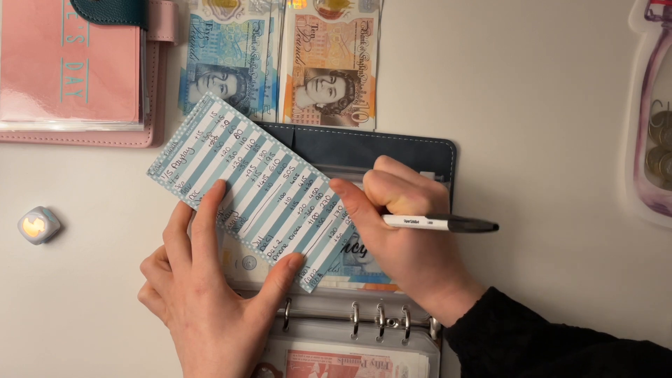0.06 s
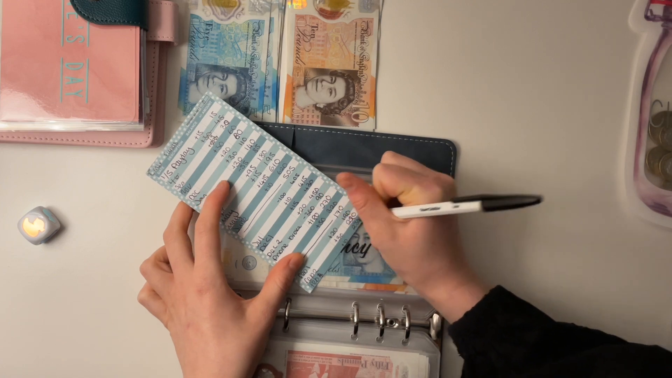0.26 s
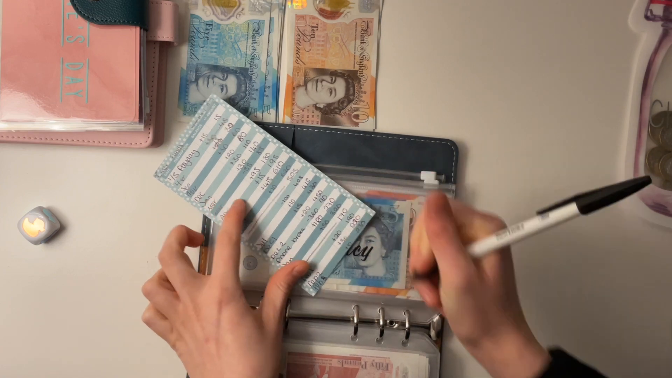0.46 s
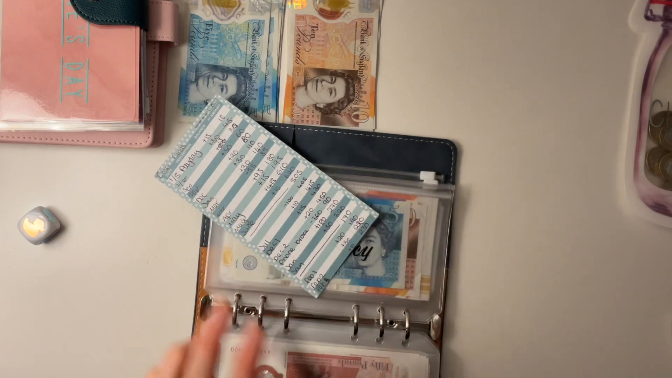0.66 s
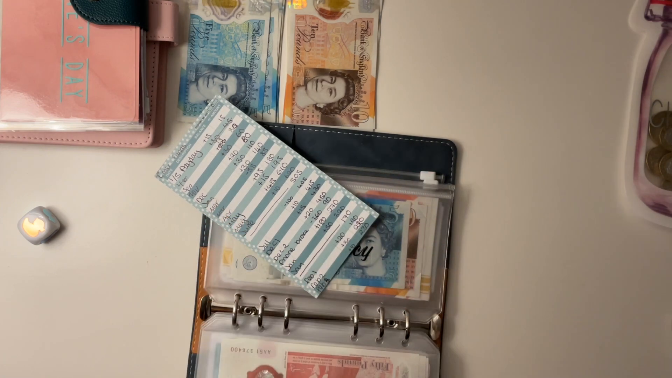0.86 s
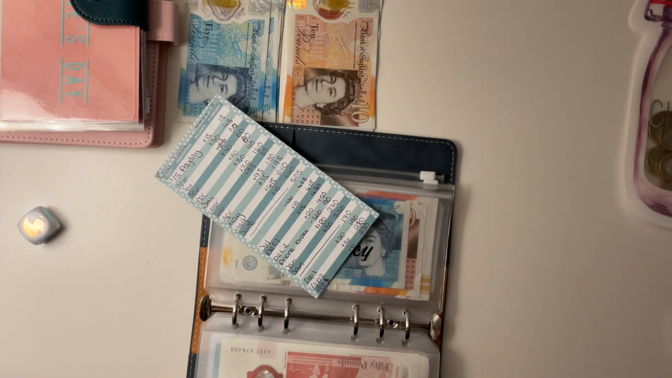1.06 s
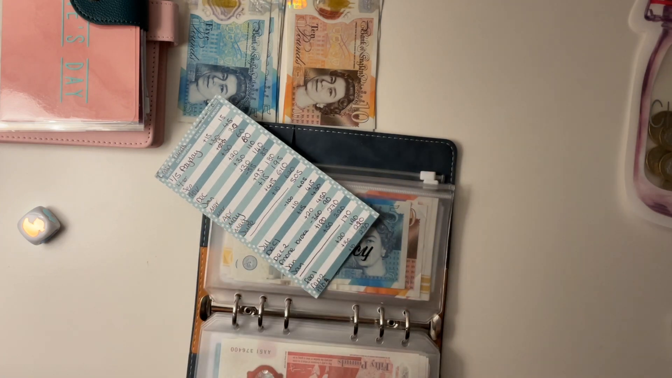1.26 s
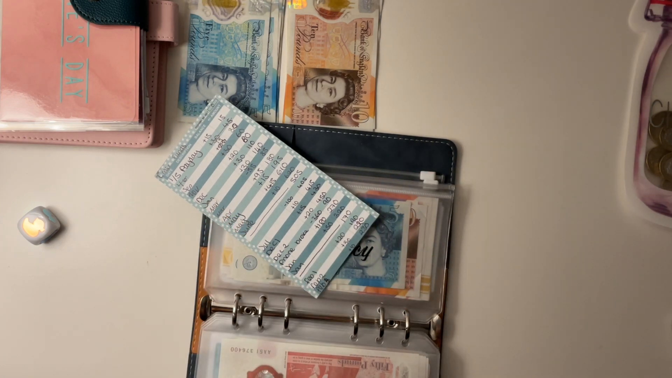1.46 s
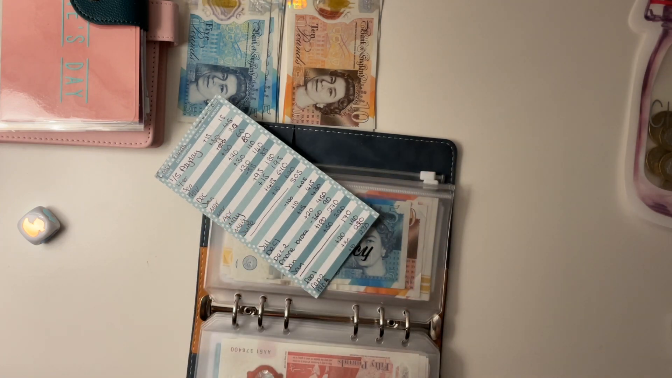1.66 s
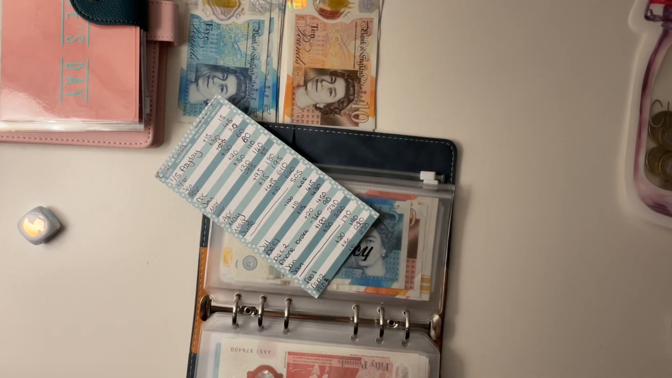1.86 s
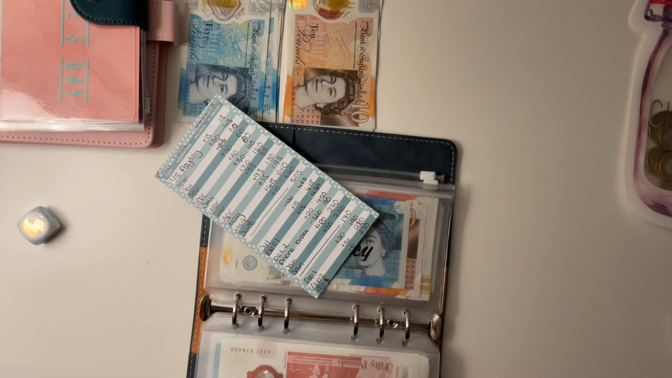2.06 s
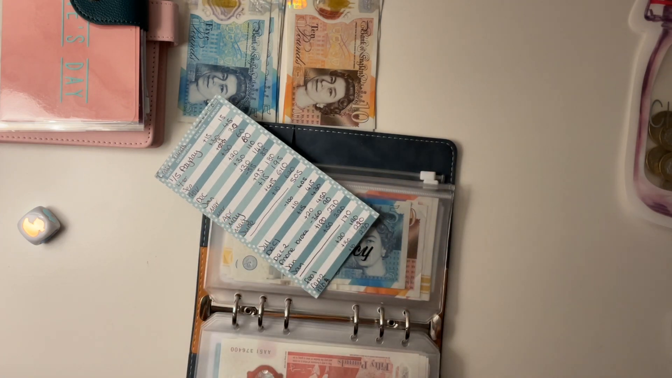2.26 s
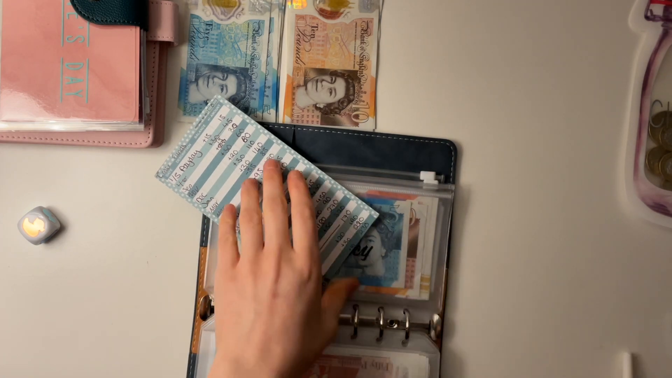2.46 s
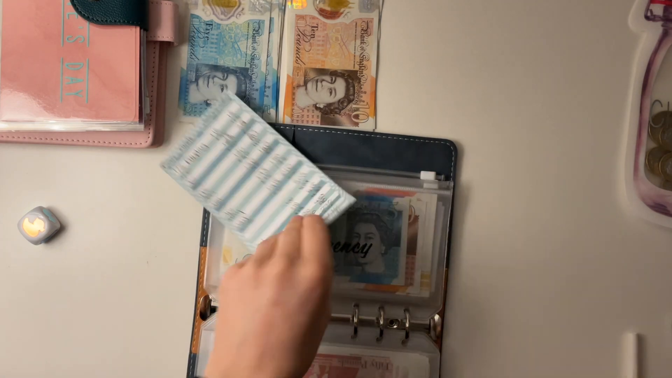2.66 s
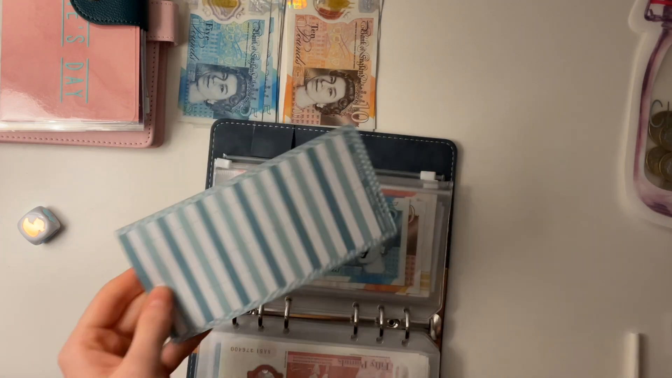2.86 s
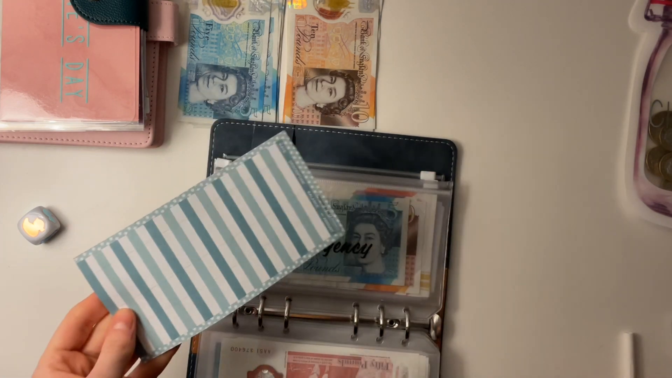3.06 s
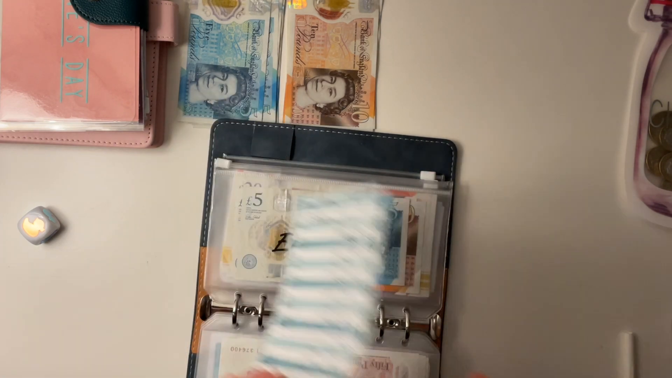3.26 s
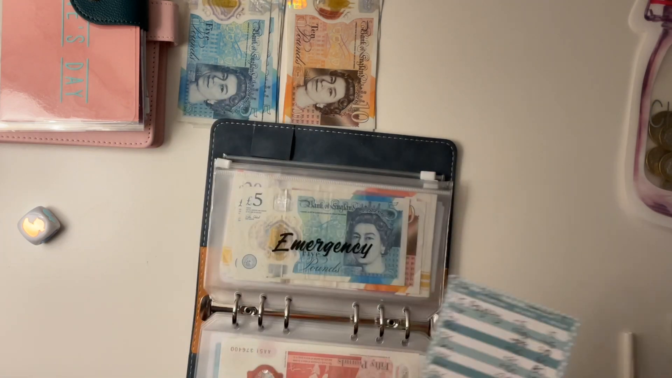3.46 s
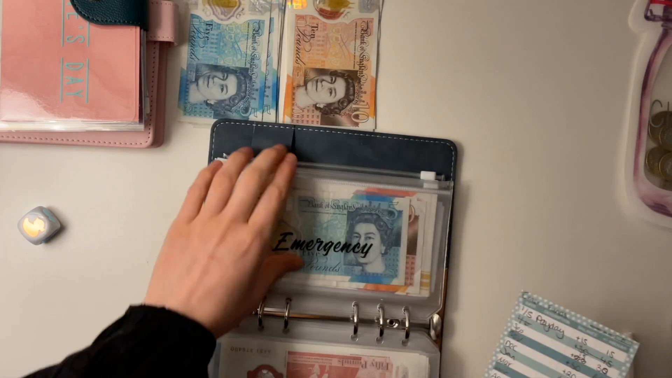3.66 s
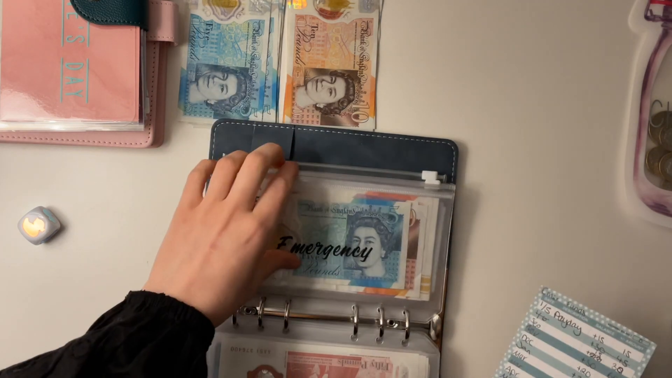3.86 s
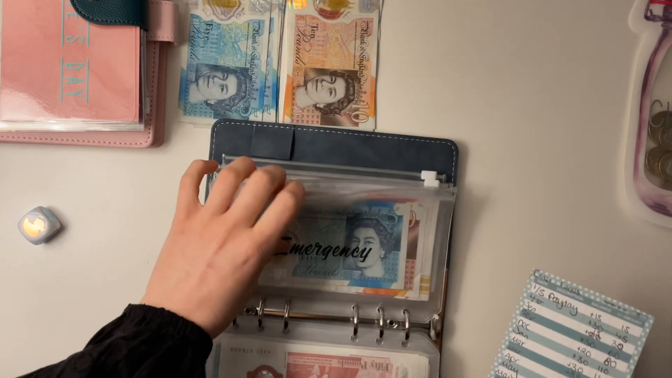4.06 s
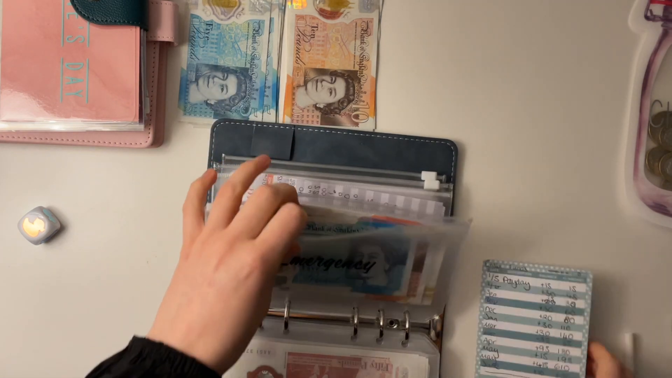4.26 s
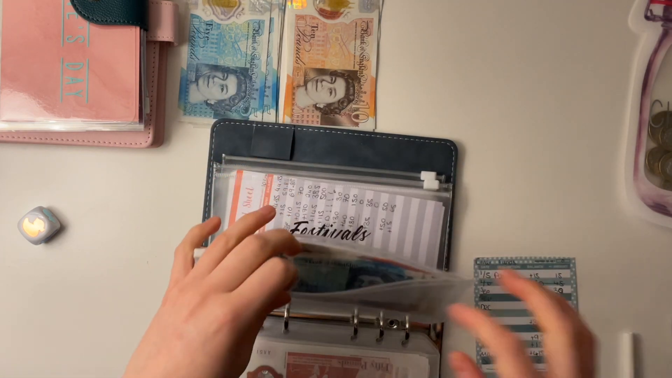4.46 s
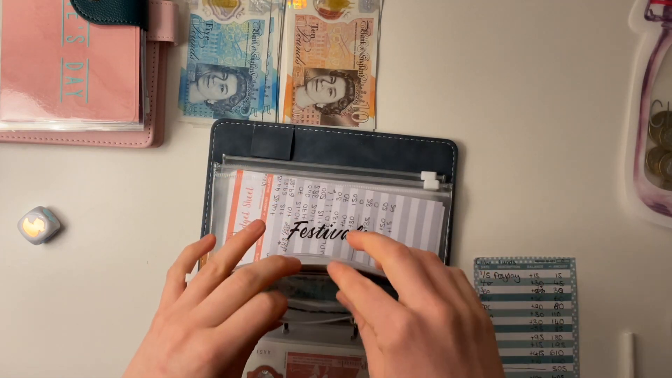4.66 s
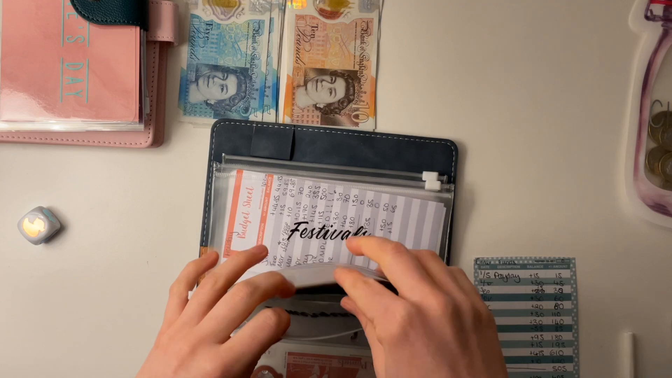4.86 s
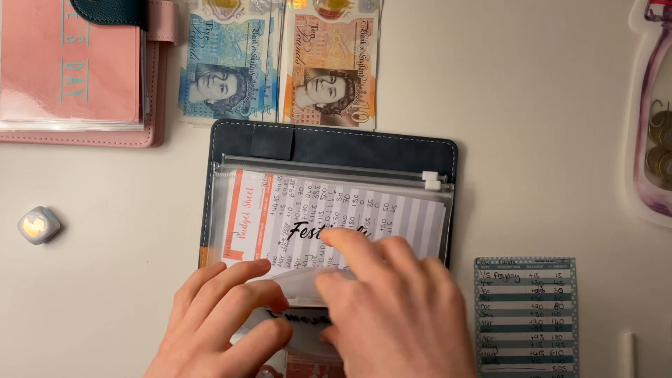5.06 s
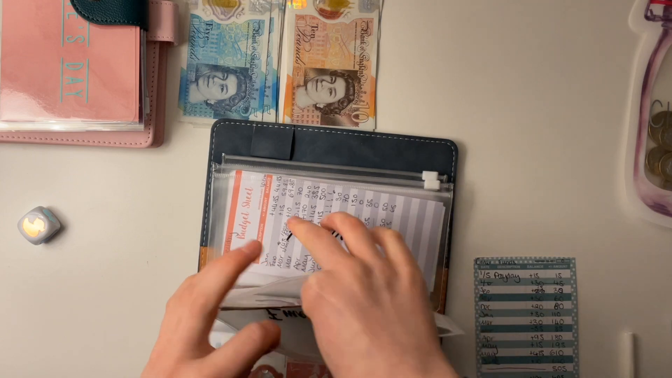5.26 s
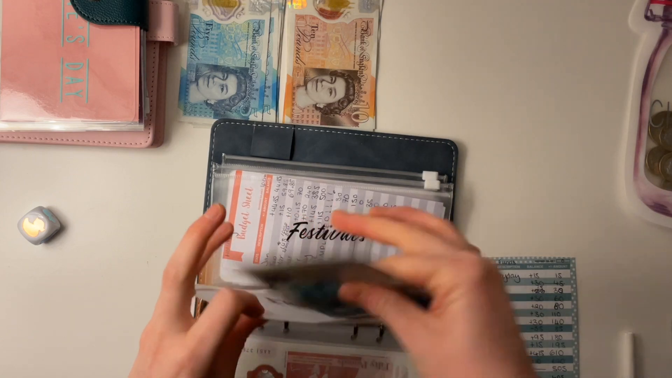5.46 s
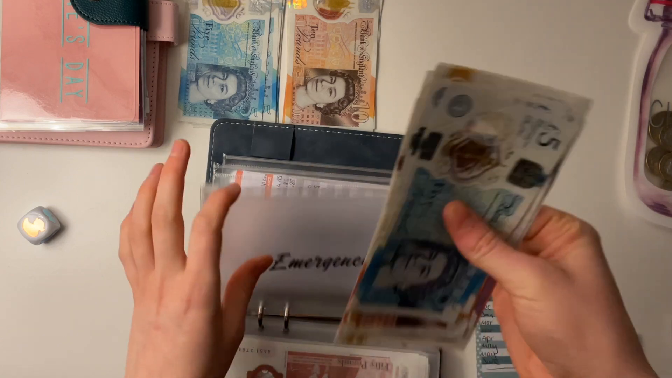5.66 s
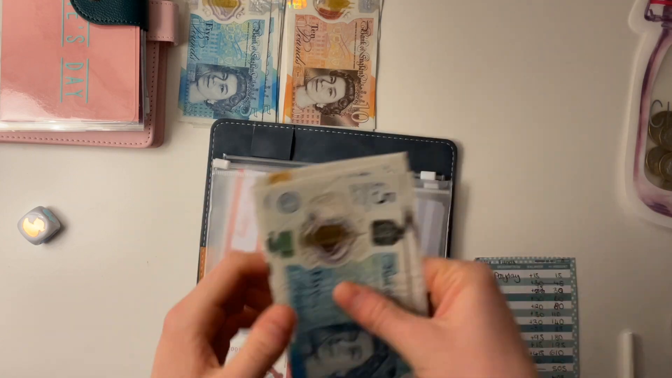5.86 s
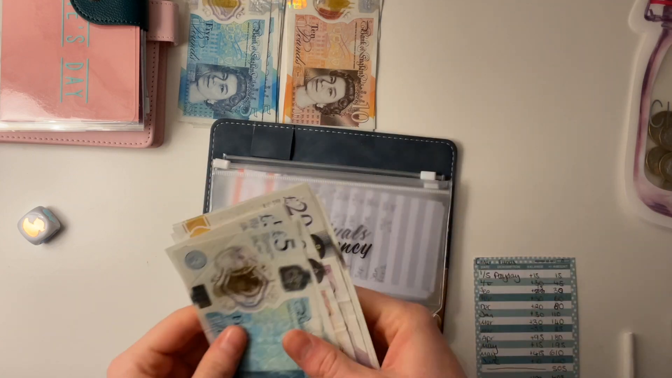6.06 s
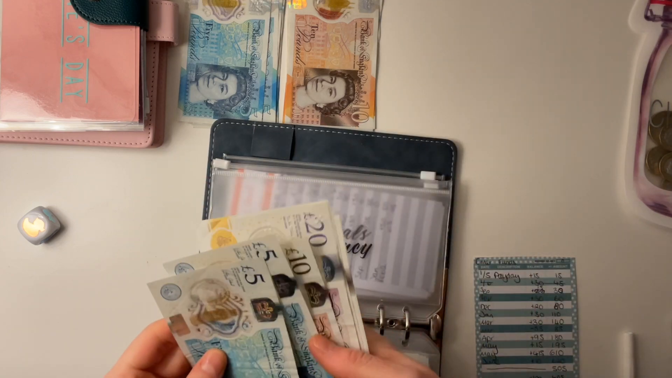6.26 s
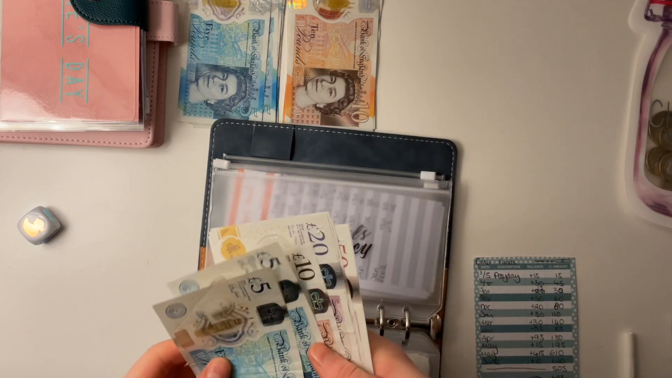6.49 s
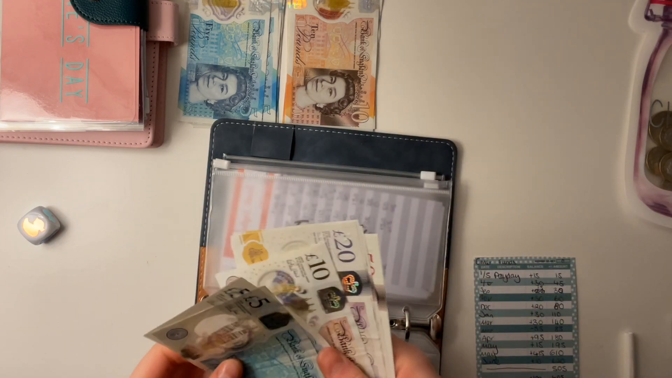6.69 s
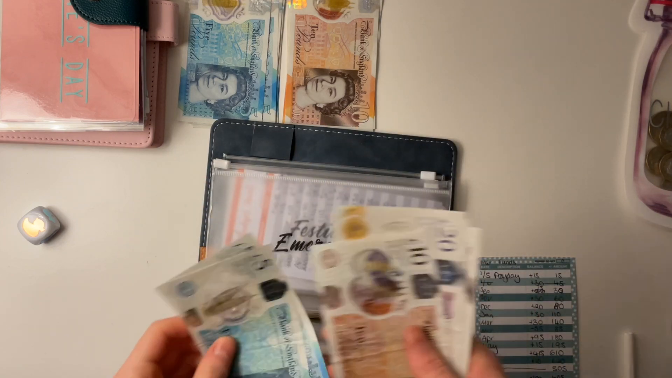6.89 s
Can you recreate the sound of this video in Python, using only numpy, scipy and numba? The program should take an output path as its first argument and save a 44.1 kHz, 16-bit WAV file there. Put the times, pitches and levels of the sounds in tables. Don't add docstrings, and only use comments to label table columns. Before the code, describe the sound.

A pen clicks shut, a card slaps and flips sharply on a desk, then banknotes slide hissing from a plastic wallet and rustle as they fan.

```python
import sys
import numpy as np
from scipy import signal
from scipy.fft import rfft, irfft
from scipy.io import wavfile
from scipy.ndimage import uniform_filter1d
from numba import njit

SR = 44100
rng = np.random.default_rng(int(sys.argv[2]) if len(sys.argv) > 2 else 0)


def undo_db(level):
    steps = np.asarray(level, float) / 20
    return 10 ** steps


def put_to_file(sound):
    columns = np.atleast_2d(sound).T
    safe = np.clip(columns, -1, 1)
    whole_steps = np.round(safe * 32767)
    wavfile.write(sys.argv[1], SR, whole_steps.astype(np.int16))


N = 305613

# (t/s, peak level/dB, resonance f/Hz, sizzle level/dB, flap level/dB)
PEN = [
    (0.3007, -43.5, 3860, -16, -4.5),
    (0.311, -44.5, 3870, -13, -5),
    (0.3896, -53, 4600, 3, 1),
    (0.4261, -59, 1800, 11, 10),
    (0.6019, -64.5, 3150, 3, 6),
    (1.0266, -31, 5900, 8, -22),
    (1.8092, -46.5, 5600, 6, -26),
    (1.8425, -48, 4030, 4, -37),
    (2.195, -59.5, 6500, 10.5, -1),
]
CARD = [
    (2.4451, -21, 4260, 0.5, -26.5),
    (2.6059, -28.5, 5700, -2, -3.5),
    (2.6268, -13.5, 2770, -1.5, -8.5),
    (2.6521, -22, 1740, -20, 1),
    (2.561, -46, 3970, 0, -10),
    (3.345, -31.5, 5000, -7.5, -8),
    (3.4057, -42.5, 4300, -3, 5.5),
]
WALLET = [
    (4.0665, -38, 3500, -2, -7.5),
    (4.2215, -54.5, 3240, 9.5, -3),
    (4.2575, -32, 2390, 3, 1),
    (4.3197, -46.5, 2630, -26, 7),
    (4.3672, -36, 2630, -24, 0),
    (4.6468, -47, 2020, -3.5, 4),
    (4.7881, -50, 3350, -22, -2),
    (4.8569, -48, 3130, -1, -7),
]
BANKNOTES = [(5.3871, -34, 3400, 4, 3), (5.6418, -39.5, 3270, 3, -3), (5.6521, -27.5, 5530, -10, -4),
             (5.7183, -30, 4570, 8, -4.5), (5.932, -61.5, 4170, 13, -10), (5.9845, -52, 2760, 4.5, -1),
             (6.6345, -42.5, 6430, 6, -28), (6.641, -58, 7500, 0, -22), (6.664, -65, 6200, -5, -13),
             (6.7717, -64, 5000, 10, -12), (6.8018, -63.5, 5390, 21, 9), (6.863, -62, 4960, 19, -3),
             (6.882, -60, 6470, 12, -10), (6.897, -53, 6000, 13, -8)]
TICKS = [(1.8193, -46, 2660, 3, -12), (2.633, -25.5, 2400, -10, -2.5), (2.6545, -32, 4170, 3, -3),
         (2.664, -39, 2400, -9, -2), (3.3415, -20.5, 2100, -25, 0), (3.3435, -24, 3850, -16, -15),
         (3.35, -30, 2050, -22, 1.5), (3.4235, -29.5, 1950, -18, 2), (3.434, -40.5, 1220, -25, 4),
         (3.678, -40.5, 4530, -30, -12), (3.6994, -50, 4770, -10, -14), (3.7429, -47, 4270, -10, 2.5),
         (3.8551, -60, 3770, -19, 1), (4.0235, -45.5, 3700, 6.5, -8.5), (4.5404, -46.5, 1950, -16, -5),
         (4.5424, -48, 3300, -22, -20), (4.566, -41.5, 1480, -28, -1), (4.575, -45, 1720, -26, -6),
         (4.7264, -51, 2280, -10, 4), (4.915, -46, 3960, -27, -26), (5.0554, -26, 2030, -28, 0),
         (5.35, -33.5, 1960, -8, -1), (5.46, -40, 2000, -6, 0), (6.582, -48, 4400, -17, -20)]


def snaps(table, t60, pocket, spread, lead_s=.012, lead_db=-28):
    rise_s, crack_s, tail_db = 0.0019, 0.0034, -9
    out, t = np.zeros(N), np.arange(SR // 4) / SR
    after = np.maximum(t - lead_s, 0)
    rattle = undo_db(tail_db - 60 * after / t60)
    shape = (1 - np.exp(-after / rise_s)) ** 2 * (np.exp(-after / crack_s) + rattle)
    creak = undo_db(lead_db) * t / lead_s * (after < rise_s)
    shape = shape + creak
    for s, db, hz, sizzle_db, flap_db in table:
        bursts = np.minimum(np.abs(crackle(len(t), 0.022, 2.3)), 6)
        creases = 1 + 0.42 * bursts * np.exp(-after / 0.016)
        low, mid, top = (shape * creases * crackle(len(t), .3, 2.0) for _ in range(3))

        broad = band(band(mid, 2230, 6800), 1090, 6500)
        tuned = band(band(mid, 0.822 * hz, 1.06 * hz), 0.87 * hz, 1.34 * hz)
        sheet = pocket * unit(tuned)
        sheet = sheet + spread * (unit(broad) + 0.77 * patches(broad, 1820, 7360, 45.0, count=14))

        edge = unit(band(top, 6700, 13400)) + 0.54 * unit(band(top, 10500, 14700))
        edge = edge + 0.31 * patches(top, 7000, 20000, 80, count=8)
        flap = 1.29 * patches(low, 460, 1685, 29, count=6) + unit(band(low, 460, 2370))
        size = undo_db(db - 6.0) * np.sqrt(np.mean(shape ** 2))
        add(out, s - .002 - lead_s, size * (sheet + undo_db(sizzle_db) * edge + undo_db(flap_db) * flap))
    return out


# (fastest at t/s, rise/s, fall/s, level/dB, brightness/dB per layer)
BRUSHES = [
    (.335, 0.049, 0.074, -62, 3),
    (.56, 0.056, 0.026, -82, 9.5),
    (.88, 0.14, 0.064, -78, 9.5),
    (1.08, 0.026, 0.21, -74.5, 4),
    (2.204, 0.14, 0.21, -73, 0.5),
    (3.23, 0.13, 0.12, -74, -1),
]
SLIDES = [(1.13, 0.072, 0.064, -84, -9), (1.64, 0.081, 0.067, -62.5, -1.5),
          (2.38, 0.16, 0.098, -75.5, -3.5), (2.49, 0.06, 0.058, -49, -2), (2.574, 0.034, 0.081, -49.5, 5),
          (2.665, 0.035, 0.05, -46.5, 1), (2.725, 0.053, 0.022, -46, 1), (2.76, 0.057, 0.042, -55.5, 7),
          (2.8, .02, 0.02, -74, 6), (2.95, 0.08, 0.027, -96, -13.5), (3.37, 0.022, 0.074, -55, 1.5),
          (3.438, 0.049, 0.023, -57, -6.5), (3.754, 0.091, 0.063, -69.5, -1.5),
          (4.082, 0.043, 0.03, -57.5, 2.5), (4.19, 0.036, 0.17, -76.5, -10), (4.28, 0.027, 0.045, -52, 1.5),
          (4.385, 0.033, 0.045, -69.5, -11), (4.67, 0.013, 0.065, -73.5, -4),
          (4.805, 0.031, 0.02, -56.5, 0.5)]
FANS = [(5.735, 0.022, 0.049, -52.5, -0.5), (5.93, 0.022, 0.047, -74, 3.7), (5.99, 0.041, 0.067, -78, 14),
        (6.1, 0.059, 0.054, -60, 6.5), (6.185, 0.066, 0.031, -71, 8.5), (6.325, 0.033, 0.036, -63.5, -4),
        (6.49, 0.063, 0.035, -68.5, 1.5), (6.6, 0.042, 0.068, -60, 3.5), (6.66, 0.055, 0.079, -64, 2.5),
        (6.77, 0.033, 0.026, -65, 0.5), (6.809, 0.023, 0.018, -62.5, 8.5), (6.845, 0.022, 0.017, -70, 12.5),
        (6.882, 0.03, 0.028, -59.5, 12.5), (6.925, .03, .04, -68, 9)]
# (t/s, level/dB, brightness/dB per layer)
REACH = [
    (4.83, -71, -11.5),
    (4.9, -68.5, -3.5),
    (4.95, -62, -2.5),
    (4.99, -53, -4),
]
PULL = [
    (5.005, -56, -7.5),
    (5.04, -50.5, -1.5),
    (5.07, -52.5, -4.5),
    (5.1, -52.5, -1.5),
    (5.15, -50.5, -1.5),
    (5.19, -51, -3),
    (5.23, -52.5, -7.5),
]
DRAW = [
    (5.245, -49.5, 3),
    (5.36, -47.5, 5),
    (5.395, -45.5, 3.5),
    (5.425, -51.5, 3.5),
    (5.48, -48, 5.5),
    (5.52, -43, 11),
    (5.55, -58.5, 8),
    (5.63, -78, -12),
]
CLOTH, PLASTIC, POLYMER = (5, 0.5, -1.5, -2.5, -3.5), (-3, -2.2, 2.5, -5, -7), (-1.5, 1, -6, -3.5, -8)
ZIP, POCKET, WAD = (-16, 0.5, 3, -6.5, -6.5), (3.5, 1.5, 3, -4.5, -9.5), (0.1, 0.4, 2, -2.5, -3.5)
SLOPE = (1.41, 0.64, -0.36, -1.45, -1.05)


def rubs():
    fade_s, swell_db = .015, 7
    t, gain = np.arange(N) / SR, np.zeros((5, N))
    slope = np.array(SLOPE)[:, None]
    for course, colour in contacts():
        s, db, tilt = np.transpose(course)
        touch = np.clip(np.minimum(t - s[0], s[-1] - t) / fade_s + 1, 0, 1)
        layer_db = np.interp(t, s, db) + slope * np.interp(t, s, tilt) + np.array(colour)[:, None]
        gain += touch * undo_db(layer_db)
    pops = uniform_filter1d(np.abs(crackle(N, 0.0016, 2.9)), size=60)
    grip = 0.24 * walk(37) + np.minimum(0.6 * pops, 10)
    # (from f/Hz, to f/Hz, share of samples that slip, flicker level/dB, resonance share)
    layers = [(9900, 15300, 0.37, 0.79, 0.072), (4210, 8700, .2, 1.3, 0.47), (1806, 4500, 0.25, 3.06, 0.52),
              (416.0, 1400, 0.12, 3.8, 0.45), (109.7, 420, 0.022, 3.1, .3)]
    out = 0
    for g, (lo_hz, hi_hz, share, flicker_db, tuned) in zip(gain, layers):
        slips = crackle(N, share, 1.2)
        modes = 0
        for _ in range(10):
            swell = undo_db(swell_db * np.minimum(walk(14), 1.1))
            modes = modes + swell * patches(slips, lo_hz, min(hi_hz, 15000), 130, count=1)
        hiss = unit(band(band(slips, lo_hz, hi_hz), 0.43 * lo_hz, 1.16 * hi_hz))
        out = out + g * undo_db(grip + flicker_db * walk(60)) * unit(hiss + tuned * unit(modes))
    return undo_db(-2.5) * out


def contacts():
    materials = [(BRUSHES, CLOTH), (SLIDES, PLASTIC), (FANS, POLYMER)]
    strokes = [(arc(*row), colour) for table, colour in materials for row in table]
    return strokes + [(REACH, ZIP), (PULL, POCKET), (DRAW, WAD)]


def arc(s, rise, fall, db, tilt):
    end_db, knee, knee_db = 32, 0.82, 9.5
    shape = [(-rise, end_db), (-rise * knee, knee_db), (0, 0), (fall * knee, knee_db), (fall, end_db)]
    return [(s + late, db - loss_db, tilt) for late, loss_db in shape]


# (t/s, length/s, from f/Hz, to f/Hz, level/dB)
WHISTLES = [(2.293, 0.17, 2300, 3100, -69), (2.44, 0.064, 9000, 9060, -51.5),
            (2.635, 0.053, 13000, 13500, -50), (2.68, 0.052, 3000, 4520, -48.5),
            (2.697, 0.033, 6000, 8500, -52), (2.902, 0.078, 700, 780, -66), (3.4, .02, 4500, 5240, -57),
            (3.435, 0.036, 800, 590, -49), (3.678, .11, 4700, 4070, -75), (4.733, 0.074, 3000, 4500, -70),
            (4.85, 0.095, 5500, 7000, -71), (4.922, 0.054, 7800, 7840, -67),
            (4.913, 0.052, 3900, 4050, -60.5), (4.839, 0.17, 2800, 3260, -63),
            (4.028, .035, 12000, 12000, -63), (4.088, .075, 3200, 3170, -68),
            (4.999, .08, 9000, 13700, -63.5), (5.3, .08, 3400, 3300, -53), (5.443, .06, 3000, 3770, -50),
            (0.612, .03, 2700, 2710, -73.5), (0.441, .05, 2900, 2500, -75), (6.346, .06, 9000, 9000, -73),
            (5.729, 0.042, 7000, 6000, -69), (4.977, .07, 7500, 10900, -69), (4.998, 0.16, 1500, 1518, -53),
            (5.235, 0.093, 5000, 4800, -57), (5.45, 0.095, 13500, 12500, -46),
            (5.606, 0.03, 1000, 1065, -56), (5.965, 0.044, 8500, 8400, -61.5), (6.07, .1, 6500, 5520, -63),
            (6.101, 0.12, 12500, 12000, -65), (6.108, 0.049, 3500, 3220, -72),
            (6.305, .035, 7500, 7530, -67), (6.457, .045, 9000, 9000, -71), (6.573, .13, 4000, 3490, -68),
            (6.58, 0.11, 6500, 7240, -61), (6.767, 0.046, 5000, 4900, -73),
            (6.85, 0.036, 13000, 12900, -56), (6.877, 0.04, 4000, 3530, -63)]


def whistles():
    width, rise, fall = 0.11, 0.38, 0.19
    out = np.zeros(N)
    for s, length, from_hz, to_hz, db in WHISTLES:
        way = np.linspace(0, 1, int(SR * length))
        phase = 2 * np.pi * np.cumsum(from_hz + (to_hz - from_hz) * way) / SR
        smooth = signal.butter(2, width * from_hz, fs=SR)
        a, b = (signal.lfilter(*smooth, crackle(len(way), 0.13, 2.1)) for _ in range(2))
        swell = np.clip(np.minimum(way / rise, (1 - way) / fall), 0, 1)
        add(out, s, undo_db(db) * swell * unit(a * np.cos(phase) + b * np.sin(phase)))
    return out


# (t/s, peak level/dB, boom level/dB, shudder level/dB)
THUDS = [(0.431, -45.5, -14, -24), (0.633, -40, -7, -35), (0.646, -27.5, -25, -34), (0.68, -65.5, 18, 0),
         (0.744, -56, -9, 3), (1.309, -70.5, 1, 19), (1.44, -71, -8, 13), (2.275, -52.5, 2.5, -17),
         (2.63, -37.5, 6.5, -35), (2.763, -56.5, -6, 0), (2.882, -54, 3, -19), (3.171, -67.5, 5.5, -10),
         (3.352, -44.5, 5.5, 2), (3.468, -54, -21, 7.5), (3.765, -54.5, -6.5, -35), (4.367, -43, -12, -11),
         (4.859, -53, -13, -12), (5.067, -32, -21, -43), (5.216, -36, -11, -10), (5.374, -36.5, -12.5, -22),
         (5.651, -40, -18, -13), (5.78, -60, -13, -1), (5.935, -56.5, -20, -15), (6.168, -59.5, -13, -1)]
# (t/s, peak level/dB, knock f/Hz, boom level/dB)
RAPS = [(0.308, -60, 750, 1.5), (1.022, -54, 565, -29), (2.256, -49.5, 580, 3), (2.444, -32, 567, -6),
        (2.653, -33.5, 765, -13), (2.924, -58.5, 685, -14), (3.341, -35.5, 424.6, 1), (3.416, -34, 550, -8),
        (3.455, -40.5, 540, -43), (3.697, -56, 610, -11), (4.085, -47.5, 450, -10.5), (4.221, -51, 600, -2),
        (4.257, -40, 362, -1), (4.563, -38.5, 757, -23), (4.644, -45.5, 354, -21), (5.053, -33, 380, -27),
        (5.454, -43.5, 620, -9.5), (5.526, -42.5, 850, -13), (5.614, -48, 424, -16),
        (5.645, -31.5, 315, -22), (5.715, -44, 480, -13), (5.929, -54.5, 620, -15),
        (5.973, -52.5, 663, -19), (5.984, -57.5, 747, -27), (6.321, -53, 610, -15.5),
        (6.632, -55, 640, -13), (6.893, -43, 760, -18)]
DESK = [(132.7, 5.5, 0.24), (145.3, 3.5, 0.099), (184, -5, 0.2)]
LEGS = [(62, -13, 0.11), (79, -2.5, 0.16)]
BINDER = [(347, 2.5, 0.019), (377, -21, 0.1), (601, 3.5, 0.065), (784, 4, 0.055), (780, -24, 0.032),
          (1165, -13, .1), (1604, 4, 0.045)]


def thumps():
    push_s, land_s = 0.0013, 0.0049
    out, top, legs, t = np.zeros(N), np.zeros(N), np.zeros(N), np.arange(SR // 4) / SR
    push = np.sin(np.pi * np.clip(t / push_s, 0, 1)) ** 2
    push = push / push.sum()
    swell = 1 - np.exp(-t / land_s)
    # (t/s, peak/dB, knock f/Hz, boom/dB, shudder/dB, t60/s, binder/dB, scuff/dB)
    landings = [(s, db, 205, boom, shudder, 0.1, -25.5, -1.5) for s, db, boom, shudder in THUDS]
    landings += [(s, db, hz, boom, -22.5, 0.14, -14, -5) for s, db, hz, boom in RAPS]
    for s, db, hz, boom_db, shudder_db, t60, body_db, scuff_db in landings:
        skin = band(band(rng.standard_normal(len(t)), 0.44 * hz, 1.38 * hz), 150, 990)
        scuff = unit(skin) * undo_db(-60 * t / t60)
        knock = ring(t == 0, hz, 0.36 * t60)
        body = 0
        for f, d, r in BINDER:
            a, b = rng.standard_normal(2)
            body = body + undo_db(d + 2.5 * a) * ring(t == 0, f * (1 + 0.016 * b), min(r, t60))
        hit = 1.62 * knock + undo_db(body_db) * body + undo_db(scuff_db) * scuff
        add(out, s - .002, undo_db(db) * swell * hit)
        add(top, s + 0.00737, undo_db(db + boom_db) * push)
        add(legs, s + 0.0039, undo_db(db + shudder_db) * push)
    boom = sum((-1) ** k * undo_db(d - 3.5) * ring(top, f, r) for k, (f, d, r) in enumerate(DESK))
    shudder = sum(undo_db(d) * ring(legs, f, r) for f, d, r in LEGS)
    return out + boom + shudder


def small_room(x):
    t60_s, damp = 0.27, 0.082
    lags = rng.integers(300, 1900, 8)
    return walls(x + 1e-18, lags, undo_db(-60 * lags / SR / t60_s), damp)


@njit
def walls(x, lags, gain, damp):
    line, soft, out = np.zeros((8, 4096)), np.zeros(8), np.zeros(len(x))
    for i in range(len(x)):
        total = 0.
        for k in range(8):
            soft[k] += (1 - damp) * (gain[k] * line[k, (i - lags[k]) & 4095] - soft[k])
            total += soft[k]
        out[i] = soft[0] - soft[3] + soft[5] - soft[6]
        for k in range(8):
            line[k, i & 4095] = x[i] + soft[k] - total / 4
    return out


# (f/Hz, level/dB per Hz)
AIR = [(18, -59), (30, -3.5), (124, -5.5), (227, -10), (295, -14.5), (364, -13.5), (822, -14), (1220, -18),
       (2980, -21.5), (12000, -23), (16000, -23)]


def air():
    hz, db = np.transpose(AIR)
    bins = np.arange(N // 2 + 1) * SR / N + 1
    colour = undo_db(np.interp(np.log(bins), np.log(hz), db))
    tone = unit(irfft(rfft(rng.standard_normal(N)) * colour, N))
    flutter = band(tone, 40, 400) * (undo_db(1.2 * walk(22)) - 1)
    return undo_db(-69) * (tone * undo_db(0.3 * walk(0.18)) + flutter)


def unit(x):
    return x / np.sqrt(np.mean(x ** 2) + 1e-30)


def band(x, lo_hz, hi_hz):
    return signal.sosfilt(signal.butter(2, [lo_hz, hi_hz], "band", fs=SR, output="sos"), x)


def ring(x, hz, t60):
    pole = np.exp(2j * np.pi * hz / SR - np.log(1000) / (t60 * SR))
    return signal.lfilter([1], [1, -pole], x).imag


def patches(x, lo_hz, hi_hz, q, count):
    out = 0
    for place, strength in rng.random((count, 2)):
        hz = lo_hz * (hi_hz / lo_hz) ** place
        out = out + undo_db(9.5 * strength) * ring(x, hz, q / hz)
    return unit(out)


def crackle(size, share, spread_db):
    clicks = (rng.random(size) < share) * rng.standard_normal(size)
    return unit(clicks * undo_db(spread_db * rng.exponential(size=size)))


def walk(rate):
    k = int(SR / rate)
    steps = np.repeat(rng.standard_normal(N // k + 1), k)
    return 1.24 * uniform_filter1d(uniform_filter1d(steps, k), k)[:N]


def add(out, s, piece):
    i = int(s * SR)
    out[i:i + len(piece)] += piece[:N - i]


def scene():
    near = thumps() + rubs() + whistles()
    for table, t60 in [(PEN, 0.16), (CARD, 0.1), (WALLET, 0.11), (BANKNOTES, 0.1)]:
        near = near + snaps(table, t60, pocket=0.91, spread=0.84, lead_db=-29)
    near = near + snaps(TICKS, 0.061, pocket=1.15, spread=0.12)
    return (near + undo_db(-17) * small_room(near) + air())[None]


def roll_off(x):
    return signal.sosfilt(signal.butter(12, 17020, fs=SR, output="sos"), x)


def record(dry):
    x = signal.sosfilt(signal.butter(6, 54, "high", fs=SR, output="sos"), dry)
    mix = signal.sosfilt(signal.ellip(10, .2, 70, 15900, fs=SR, output="sos"), x)
    return roll_off(mix)


dry = scene()
out = record(dry)
put_to_file(out)
```